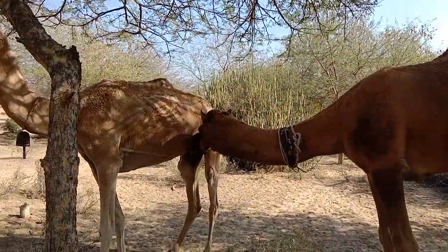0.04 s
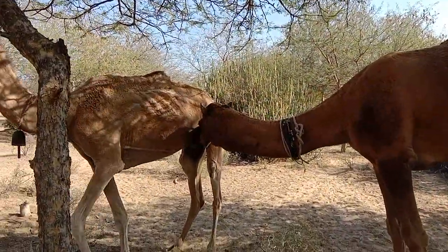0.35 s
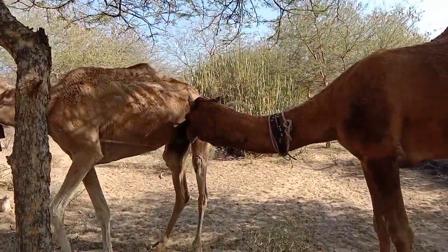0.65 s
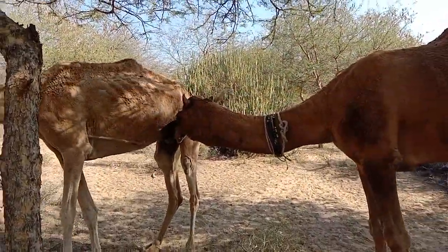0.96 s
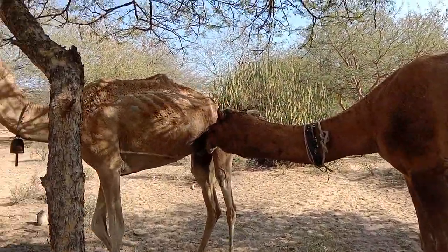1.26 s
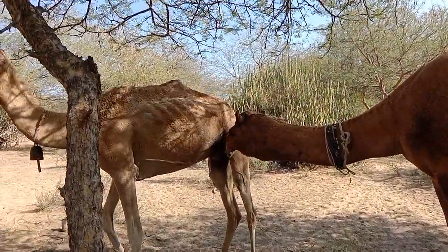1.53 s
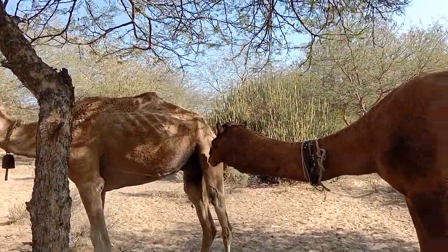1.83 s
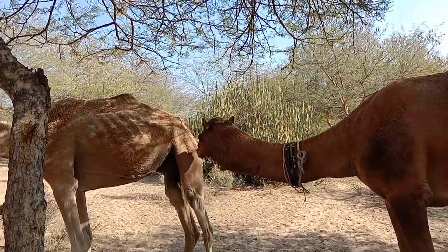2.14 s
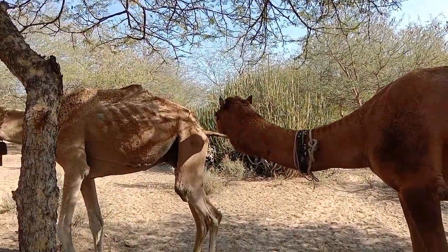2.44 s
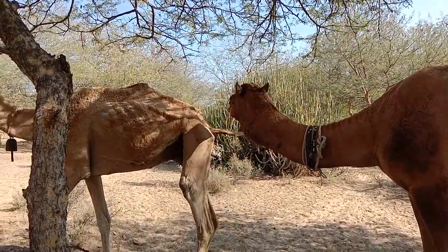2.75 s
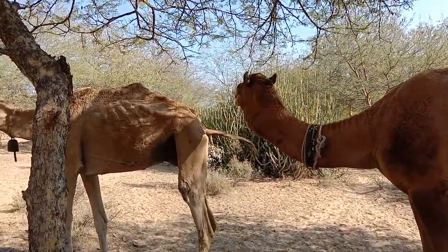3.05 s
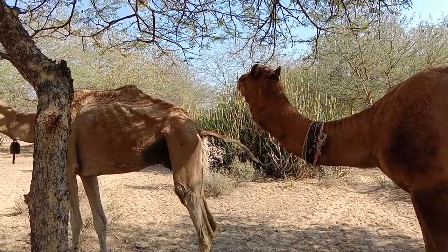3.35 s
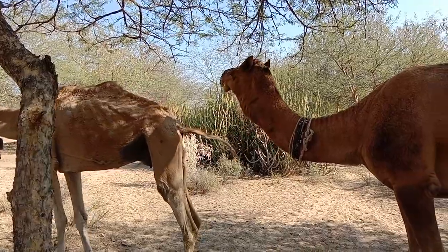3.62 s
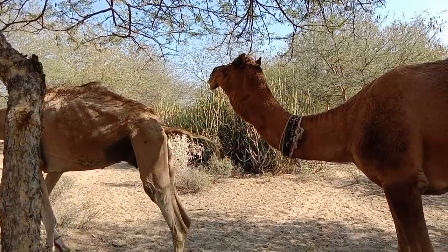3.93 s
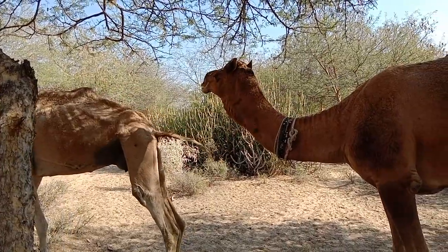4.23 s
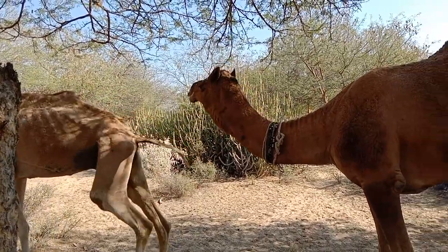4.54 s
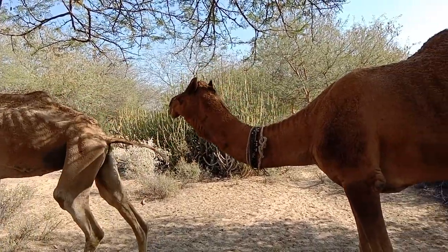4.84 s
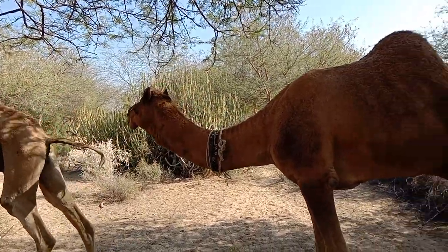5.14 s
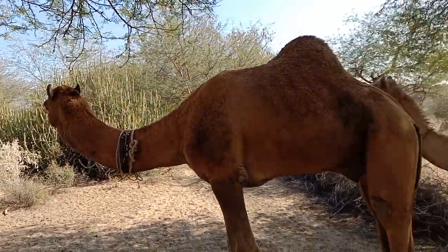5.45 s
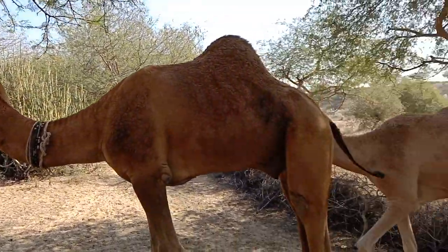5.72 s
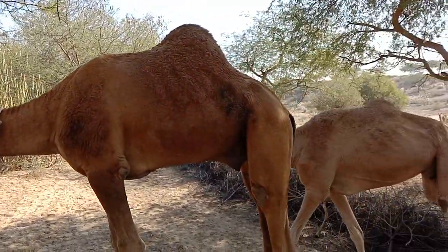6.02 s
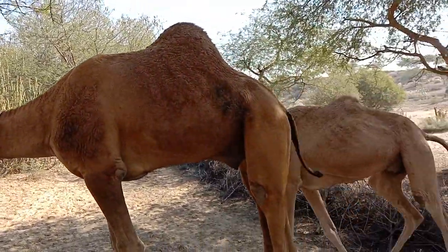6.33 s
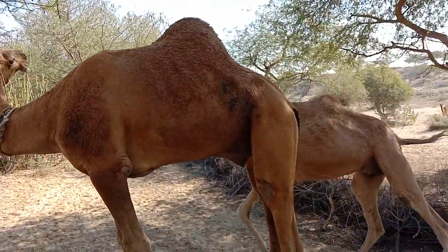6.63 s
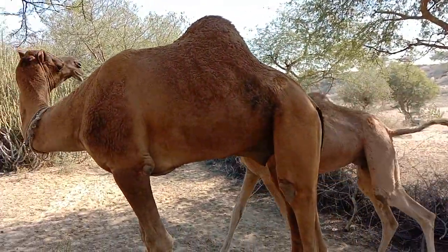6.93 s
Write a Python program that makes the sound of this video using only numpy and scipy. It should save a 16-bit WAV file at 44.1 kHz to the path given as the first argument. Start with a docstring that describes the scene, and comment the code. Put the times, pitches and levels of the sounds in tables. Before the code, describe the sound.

A camel's metal neck bell clanks unevenly, with dry twigs rustling and snapping and faint bird chirps in open air.

```python
"""Camel bell in desert scrub.

A sheet-metal bell on a camel's neck clanks unevenly as the animals shift about. The clapper strikes
the wall or rolls along the rim: the air in the bell hoots, the shell clangs above it. Feet scuff sand,
dry twigs rustle and snap, and a small bird chirps. A faint low rumble comes and goes underneath, and
a low drone swells at the end."""
import sys
import numpy as np
from scipy import signal
from scipy.fft import rfft, irfft
from scipy.io import wavfile
from scipy.ndimage import map_coordinates

SR = 44100
rng = np.random.default_rng(int(sys.argv[2]) if len(sys.argv) > 2 else 0)


def dump(signal):
    """Clip the signal to [-1, 1] and save it as 16-bit WAV at the path in sys.argv[1]."""
    limited = np.clip(np.atleast_2d(signal).T, -1, 1)
    pcm = np.round(limited * 32767).astype(np.int16)
    wavfile.write(sys.argv[1], SR, pcm)


N = 312228
TIME = np.arange(N) / SR


def from_db(db):
    """Decibels to gain."""
    return np.exp(np.asarray(db) * (np.log(10) / 20))


def unit_rms(x):
    """Scale to rms 1."""
    return x / np.sqrt(np.mean(x ** 2) + 1e-20)


def drift(rate_hz):
    """Slow random wander, rms 1."""
    knots = rng.standard_normal(4096)
    return unit_rms(np.interp(TIME * rate_hz, np.arange(len(knots)), knots))


def bandpass(x, order, low_hz, high_hz):
    """Butterworth band-pass."""
    return signal.sosfilt(signal.butter(order, [low_hz, high_hz], "band", fs=SR, output="sos"), x)


def coloured(x, colour):
    """Minimum-phase filter of unit power gain, shaped by (Hz, dB) rows."""
    size = 16384
    hz, db = np.transpose(colour)
    grid_hz = np.maximum(np.arange(size // 2 + 1) * SR / size, 1)
    gain = unit_rms(from_db(np.interp(np.log(grid_hz), np.log(hz), db)))
    causal_fold = np.r_[1, np.full(size // 2 - 1, 2), 1, np.zeros(size // 2 - 1)]
    cepstrum = irfft(np.log(gain)) * causal_fold
    return signal.fftconvolve(x, irfft(np.exp(rfft(cepstrum))))[:N]


def ring(drive, hz, t60_s):
    """One mode: a unit click starts a decaying sine of height 1."""
    radius, angle = from_db(-60 / (t60_s * SR)), 2 * np.pi * hz / SR
    return signal.lfilter([0, np.sin(angle)], [1, -2 * radius * np.cos(angle), radius ** 2], drive + 1e-18)


def clicks_at(times, heights):
    """One-sample clicks."""
    out = np.zeros(N)
    out[np.clip(np.round(times * SR).astype(int), 0, N - 1)] = heights
    return out


def bursts(times, db, t60_s):
    """Noise bursts: instant onset, exponential decay."""
    onsets = clicks_at(times, from_db(db) ** 2)
    power = signal.lfilter([1], [1, -from_db(-120 / (t60_s * SR))], onsets + 1e-18)
    return np.sqrt(power) * rng.standard_normal(N)


def grains(per_s, spread_db):
    """Random tiny contacts of unequal size, rms 1."""
    gaps, sizes, signs = rng.exponential(1, (3, 30000))
    times = np.cumsum(gaps) / per_s
    heights = from_db(spread_db * np.minimum(sizes, 4)) * np.sign(signs - np.log(2))
    inside = times < TIME[-1]
    return unit_rms(clicks_at(times[inside], heights[inside]))


def crunch(per_s, spread_db, patchy_db):
    """Bits of every size break: each band gets its own clumped grains; rms 1."""
    edges_hz = np.geomspace(500, 14000, 15)
    out = 0
    for low_hz, high_hz in zip(edges_hz, edges_hz[1:]):
        clumps = grains(per_s, spread_db) * from_db(patchy_db * drift(35))
        out += bandpass(clumps + 1e-18, 2, low_hz, high_hz)
    return unit_rms(out)


def swells(rows, attack_s, sag_db_per_s, release_db_per_s):
    """Rubbing contacts (t, length, levels...) summed in power: one gain curve per level column."""
    power = np.zeros((len(rows[0]) - 2, N))
    for start, length, *levels_db in rows:
        span = slice(*np.searchsorted(TIME, [start - attack_s, start + length + .5]))
        age = TIME[span] - start
        rise = np.clip(1 + age / attack_s, 0, 1) ** 2
        fall_db = sag_db_per_s * np.maximum(age, 0) + release_db_per_s * np.maximum(age - length, 0)
        power[:, span] += np.outer(from_db(levels_db), rise * from_db(-fall_db)) ** 2
    return np.sqrt(power)


# breeze spectrum: f/Hz, density/dB
BREEZE_COLOUR = [(18, -33), (30, -15), (449, -15.5), (649, -4.5), (822, -12.5), (2350, -8.5), (4190, -24.5),
                 (5450, -13.5), (7270, -22.5), (10200, -16), (16000, -26)]


def breeze(level_db):
    """Faint steady breeze with a trace of the bell's hollow note."""
    return from_db(level_db) * coloured(rng.standard_normal(N), BREEZE_COLOUR)


# low rumble envelope: t/s, level/dB
LOW_RUMBLE_LEVELS = [(0, -89.5), (0.5, -87.5), (1.05, -79.5), (1.3, -86), (2.0, -79.5), (2.35, -88.5),
                     (2.85, -77), (3.5, -81.5), (4.3, -84.5), (5.05, -89), (5.6, -83.5), (6.1, -101),
                     (6.6, -82), (7.08, -84)]
# low rumble spectrum: f/Hz, density/dB
LOW_RUMBLE_COLOUR = [(20, -10), (50, -7.5), (90, 3), (135, -1), (200, 2), (400, -2.5), (800, -26)]


def low_rumble(gain_db):
    """Faint low rumble that slowly swells and fades."""
    level_db = np.interp(TIME, *np.transpose(LOW_RUMBLE_LEVELS)) + gain_db
    return from_db(level_db) * coloured(rng.standard_normal(N), LOW_RUMBLE_COLOUR)


# bird calls: peak t/s, f/Hz, level/dB, 1/e half-length/s, rasp bandwidth/Hz
CHIRPS = [(0.01, 2340, -67.5, 0.087, 470), (0.395, 1816, -53.5, 0.0053, 620),
          (0.861, 2386, -59.5, 0.06, 60), (0.855, 2036, -56, 0.059, 61.7), (0.832, 1127, -53.5, 0.021, 90),
          (0.903, 2750, -59.5, 0.022, 150), (1.151, 1517, -45.5, 0.028, 130),
          (1.538, 1360, -64, 0.072, 30.1), (2.527, 2400, -52.5, 0.045, 220),
          (5.459, 3090, -45.5, 0.0083, 596), (5.691, 3080, -49.5, 0.015, 565),
          (5.906, 2955, -48.5, 0.016, 600), (6.149, 2150, -55, 0.014, 475), (6.383, 2026, -53, 0.019, 487),
          (6.615, 2080, -59, 0.03, 708), (6.819, 1950, -47, 0.019, 437)]


def bird(glide_hz, upper_ratio, upper_db, lisp_hz, lisp_db, near_db, near_s, far_db, far_s):
    """Raspy falling chips with a faint upper band and a high lisp; near and far bushes scatter them."""
    out = np.zeros(N)
    harshest_hz = max(row[-1] for row in CHIRPS)
    for peak_s, hz, db, half_s, width_hz in CHIRPS:
        span = np.abs(TIME - peak_s) < .3
        age = TIME[span] - peak_s
        phase = 2 * np.pi * np.cumsum(hz - glide_hz * np.tanh(age / half_s)) / SR
        white = rng.standard_normal((4, len(age)))
        rasp = unit_rms(signal.sosfilt(signal.butter(3, width_hz / 2, fs=SR, output="sos"), white))
        main = rasp[0] * np.sin(phase) + rasp[1] * np.cos(phase)
        upper = rasp[2] * np.sin(upper_ratio * phase) + rasp[3] * np.cos(upper_ratio * phase)
        hiss = bandpass(white[0], 2, lisp_hz - 2 * width_hz, lisp_hz + 2 * width_hz)
        lisp = unit_rms(hiss) * width_hz / harshest_hz
        near = from_db(near_db) * np.exp(-np.abs(age) / near_s)
        far = from_db(far_db) * np.exp(-np.abs(age) / far_s)
        envelope = np.exp(-(age / half_s) ** 2) + (near + far) * (age > 0)
        out[span] += from_db(db) * envelope * (main + from_db(upper_db) * upper + from_db(lisp_db) * lisp)
    return out


# clapper blows: t/s, hoot level/dB, hoot t60/s, hoot starting bend/Hz,
# shell family levels/dB (lowest mode, its twin, low, middle, top), favoured f/Hz (middle, top)
BLOWS = [(0.114, -37, 0.13, 16.5, -83, -68, -52, -54.5, -47.5, 3455, 4770),
         (0.257, -23.5, 0.14, -3.5, -72, -56.5, -53, -58, -61, 3130, 4840),
         (0.554, -17, 0.18, 4, -82, -57.5, -40.5, -42.5, -39.5, 3455, 5100),
         (0.719, -23, 0.21, 9.5, -87, -57, -57, -51, -52, 3455, 4805),
         (0.917, -13, 0.15, 10.5, -73, -63, -55, -41.5, -35.5, 3854, 4750),
         (0.958, -28.5, 0.25, 0.5, -49, -48, -56, -36.5, -36.5, 3265, 5500),
         (1.014, -17, 0.31, -3, -46, -53, -58, -40.5, -41, 3130, 5869),
         (1.38, -29.5, 0.12, -3, -69, -71, -45.5, -51, -40.5, 3098, 5000),
         (1.488, -29, 0.12, -16, -71, -72, -54, -50, -51, 3455, 5869),
         (1.601, -24.5, 0.16, -2, -79, -70, -48.5, -56, -70, 3450, 5100),
         (1.765, -26.5, 0.11, -18.5, -62, -40, -51, -34.5, -38.5, 3098, 5070),
         (1.806, -25.5, 0.17, -2.5, -56, -50, -57, -37.5, -38, 3098, 5070),
         (1.862, -26.5, 0.22, 7.5, -67, -40, -48.5, -71, -45.5, 3098, 4750),
         (1.907, -11, 0.16, -14.5, -36, -59, -67, -44.5, -32.5, 4295, 5680),
         (2.127, -13, 0.18, -10.5, -40.5, -67, -54, -47, -29, 3098, 5640),
         (2.158, -15.5, 0.073, 11.5, -50, -66, -46.5, -38.5, -37.5, 3455, 5030),
         (2.233, -25.5, .17, 19, -59, -46, -53, -45.5, -48.5, 3455, 4770),
         (2.458, -17.5, 0.17, -22.5, -42.5, -67, -59, -56, -33, 3854, 5869),
         (2.565, -16.5, .18, -6, -47.5, -38, -70, -25.5, -34, 3098, 5060),
         (2.576, -33, .17, 0, -65, -58, -57, -44, -30.5, 4080, 5930),
         (2.756, -11.5, .08, -12, -35.5, -55, -59, -45.5, -23.5, 3098, 5760),
         (2.963, -22, 0.19, 1, -53, -62, -37, -30, -28, 3455, 4790),
         (2.978, -8, 0.12, 0, -28.5, -57, -55, -45, -23, 3455, 5600),
         (3.027, -23, 0.16, 12, -35, -55, -69, -41.5, -27.5, 3854, 5270),
         (3.251, -14, 0.062, -48, -37.5, -66, -53, -58, -24.5, 3850, 5114),
         (3.311, -28, 0.25, 22.5, -53, -40, -40, -38.5, -34.5, 4009, 4790),
         (3.502, -14.5, 0.13, -38, -35.5, -50, -50, -43, -17.5, 3687, 5120),
         (3.704, -24, 0.1, 8.5, -69, -72, -49, -45.5, -33.5, 3854, 4970),
         (3.877, -25, 0.18, -21, -74, -68, -63, -47, -36, 3854, 5093),
         (4.154, -20, 0.17, -21, -50.5, -75, -74, -40, -28, 3854, 5680),
         (4.426, -20.5, .14, 11, -85, -58.5, -55.5, -44.5, -25.5, 3854, 4805),
         (4.578, -29, 0.11, -43.5, -82, -90, -82, -59, -41, 3098, 5093),
         (4.843, -14.5, 0.2, -47, -57, -76, -83, -36, -25.5, 3830, 5869),
         (5.173, -12.5, 0.21, 0.5, -80.5, -76, -56, -46.5, -28.5, 3250, 4770),
         (5.255, -38, .17, 0, -85, -76.5, -73, -42, -40, 3250, 6928),
         (5.331, -27, 0.22, -7.5, -88, -74, -86, -52, -42.5, 3265, 6250),
         (5.479, -15.5, .17, 3.5, -80.5, -73, -74, -56, -48.5, 3854, 5740),
         (5.502, -11.5, 0.17, -29, -38, -59, -70, -36.5, -24, 3854, 5680),
         (5.806, -41, 0.2, -9.5, -69, -64.5, -83, -71, -59, 3670, 5700),
         (6.556, -30.5, 0.21, -13.5, -63.5, -76, -77.5, -62, -44.5, 3030, 5680),
         (6.65, -16, 0.13, 13, -62, -44, -43, -49.5, -28, 3854, 5500),
         (6.861, -19.5, 0.19, -19.5, -51.5, -59, -55.5, -55.5, -40, 3800, 5680)]
# clapper leaning on the wall, muting the hoot: t/s, depth/dB
MUTES = [(2.009, 13.5), (2.192, 11), (2.528, 10), (2.808, 14), (3.272, 26.5), (3.551, 33), (5.286, 8),
         (6.698, 10.5)]


def hoot(rolling, pitch_hz, waver_hz, settle_s, rise_s, rise_shape, decay_shape,
         blow_db, roll_db, wobble_db, mute_s):
    """The air in the bell swells at each blow, glides to pitch and dies; rolling sustains it."""
    power = (rolling * from_db(roll_db + wobble_db * drift(60))) ** 2
    hz = pitch_hz + waver_hz * drift(54)
    for start, db, t60_s, bend_hz, *_ in BLOWS:
        span = slice(int(start * SR), min(int(start * SR) + SR // 2, N))
        age = TIME[span] - TIME[span][0]
        rise = 1 - np.exp(-(age / rise_s) ** rise_shape)
        decay_db = 60 * (age / t60_s) ** decay_shape
        power[span] += (rise * from_db(db + blow_db - decay_db)) ** 2
        hz[span] += bend_hz * np.exp(-age / settle_s)
    grit = 1 + .05 * drift(130)
    mute_db = sum(depth * np.exp(-np.minimum(((TIME - t) / mute_s) ** 2, 20)) for t, depth in MUTES)
    return np.sqrt(power) * from_db(-mute_db) * grit * np.sin(2 * np.pi * np.cumsum(hz) / SR)


# shell modes: f/Hz, level within family/dB, t60/s before damping
SHELL_MODES = [(1551, 0, .55), (1604, -4, .6), (1835, 0, .6), (2040, -14, .5), (2201, -20, .3),
               (2530, -15, .25), (2826, -15, .25), (3030, -12, .3), (3098, -5, .66), (3265, -2, .3),
               (3327, -8, .25), (3455, -1, .3), (3687, -8, .4), (3854, -2, .34), (4009, -5, .48),
               (4080, -8, .44), (4295, -12, .25), (4505, -9, .36), (4598, -5, .27), (4735, -8, .16),
               (4805, -3, .2), (5038, -2, .22), (5093, -5, .22), (5114, -1, .2), (5313, -1, .2),
               (5372, -5, .22), (5500, -5, .2), (5566, -3, .2), (5680, -1, .2), (5803, -9, .2),
               (5869, -1, .2), (5953, -12, .2), (6200, -6, .2), (6389, -9, .24), (6610, -4, .22),
               (6766, -11, .2), (6928, -12, .2), (7090, -11, .2), (7420, -15, .2), (8100, -18, .2),
               (8354, -18, .2)]
# borders of the five mode families: f/Hz
FAMILY_EDGES_HZ = [1580, 1700, 2500, 4300]
LIP_MODE_HZ, LIP_BOOST_DB = 4805, 8  # a blow on the very lip rings this mode almost alone


def shell(grazing, family_db, damping, favour_db, below_db_per_octave, above_db_per_octave,
          scatter_db, contact_s, chatter_db, chatter_t60_s, graze_db, roam_db):
    """Blows feed the modes their contact point favours, then chatter; grazing roams from mode to mode."""
    blows, modes = np.array(BLOWS), np.array(SHELL_MODES)
    times, levels_db, mode_hz = blows[:, 0], blows[:, 4:9] + family_db, modes[:, 0]
    families = np.searchsorted(FAMILY_EDGES_HZ, mode_hz)
    favoured_hz = np.where(families == families.max(), blows[:, -1:], blows[:, -2:-1])
    octaves = np.log2(mode_hz / favoured_hz)
    loss_db = octaves * np.where(octaves < 0, -below_db_per_octave, above_db_per_octave)
    # high modes depend most on the exact spot
    luck_db = scatter_db * mode_hz / mode_hz[-1] * rng.standard_normal(octaves.shape)
    lip_db = LIP_BOOST_DB * (mode_hz == LIP_MODE_HZ)
    graze = grazing * grains(per_s=300, spread_db=7.0)
    # modes build up while the clapper touches the wall
    lags = np.arange(int(contact_s * SR)) / SR
    push = np.hanning(len(lags)) * 4 / len(lags)
    contact_times = np.round(times * SR)[:, None] / SR + lags
    out = 0
    for family in np.unique(families):
        own = families == family
        distance = np.abs(octaves[:, own])
        nearest = distance == distance.min(axis=1, keepdims=True)
        boost_db = np.where(nearest, favour_db[family] + lip_db[own], luck_db[:, own])
        share = from_db(modes[own, 1] - loss_db[:, own] + boost_db)
        share /= np.linalg.norm(share, axis=1, keepdims=True)
        chatter = bursts(times, levels_db[:, family] + chatter_db[family], chatter_t60_s)
        for k, (hz, db, t60_s) in enumerate(modes[own]):
            heights = from_db(levels_db[:, family]) * share[:, k]
            struck = clicks_at(contact_times, np.outer(heights, push * np.cos(2 * np.pi * hz * lags)))
            rubbed = from_db(db) * (chatter + graze * from_db(graze_db[family] + roam_db * drift(16)))
            out += (-1) ** k * ring(struck + rubbed, hz, t60_s / damping[family])
    return bandpass(out, 3, 1150, 9500)  # a small shell radiates no bass


def jiggle(clang, travel_m, jerk_hz, buzz_depth, buzz_hz):
    """The bell jerks on its strap, so its partials waver in pitch; its loose seam makes them buzz."""
    sound_m_per_s = 343
    shift_samples = travel_m * drift(jerk_hz) * SR / sound_m_per_s
    moved = map_coordinates(clang, [np.arange(N) + shift_samples], order=3)
    return moved * (1 + buzz_depth * drift(buzz_hz))


# clapper contact spectrum: f/Hz, density/dB
CLATTER_COLOUR = [(40, -20.5), (300, -5.5), (1200, 5.5), (2500, -27), (5500, 0.5), (7000, -11), (8500, -4),
                  (12000, -4.5), (16000, -16.5)]
# bell mouth spectrum: f/Hz, density/dB
CLONK_COLOUR = [(100, -35.5), (420, -29.5), (620, 12.5), (830, 1), (1000, -16), (1400, -18), (3000, -43)]


def clatter(crack_db, crack_t60_s, wash_db, wash_t60_s, clonk_db, clonk_t60_s):
    """Square hits crack, the rough metal leaves a faint wash, hard blows clonk from the mouth."""
    times, hoot_db, _, _, lowest_db, twin_db, _, _, top_db, _, _ = np.transpose(BLOWS)
    force_db = (hoot_db + top_db) / 2
    square_db = (np.maximum(lowest_db, twin_db) + top_db) / 2
    hardness_db = .5 * (force_db - force_db.max())
    crack = bursts(times, square_db + crack_db, crack_t60_s)
    wash = bursts(times, force_db + wash_db, wash_t60_s)
    clonk = bursts(times, force_db + hardness_db + clonk_db, clonk_t60_s)
    return coloured(crack + wash, CLATTER_COLOUR) + coloured(clonk, CLONK_COLOUR)


# dull thumps: t/s, level/dB
THUMPS = [(0.556, -67), (0.92, -64), (2.127, -64), (3.503, -61), (4.424, -69), (5.176, -63), (6.364, -69),
          (6.765, -69), (6.96, -72)]


def thuds(low_noise_db, thump_db, t60_s, top_hz):
    """A faint burst of low noise under each clank; a few heavier thumps stand out."""
    blow_times, hoot_db = np.array(BLOWS)[:, :2].T
    thump_times, peak_db = np.transpose(THUMPS)
    low_bursts = bursts(blow_times, hoot_db + low_noise_db, t60_s)
    thumps = bursts(thump_times, peak_db + thump_db, t60_s)
    return bandpass(low_bursts + thumps, 2, 30, top_hz) * np.sqrt(SR / 2 / top_hz)


# clapper on the rim: t/s, length/s, hoot level/dB, grazing level/dB
ROLLS = [(0.13, 0.12, -30.5, -56), (0.575, 0.3, -35, -63.5), (1.04, 0.064, -25.5, -39.5),
         (1.395, 0.062, -36.5, -45.5), (1.5, 0.25, -43.5, -62), (1.92, 0.075, -30.5, -42.5),
         (2.0, 0.14, -46, -49.5), (2.3, 0.14, -48.5, -69), (2.6, 0.18, -23.5, -43.5),
         (2.75, 0.06, -32, -50), (2.83, 0.14, -34.5, -38.5), (3.05, 0.25, -29, -43),
         (3.34, 0.21, -26, -49.5), (3.6, 0.11, -45.5, -52.5), (3.75, 0.12, -36, -40),
         (3.95, 0.18, -43.5, -49.5), (4.28, 0.076, -62.5, -50.5), (4.52, 0.31, -46.5, -58),
         (4.89, 0.031, -29.5, -38.5), (5.255, 0.078, -33, -42.5), (5.35, 0.15, -44, -72.5),
         (5.53, 0.04, -23, -37.5), (5.61, 0.081, -52.5, -78), (6.59, 0.08, -41, -50),
         (6.68, 0.081, -32.5, -40.5), (6.77, 0.2, -35, -71), (6.9, 0.071, -38, -65),
         (7.0, 0.23, -48.5, -86)]


def rim_rolls():
    """The clapper rolls along the rim: gain curves that drive the hoot and graze the shell."""
    return swells(ROLLS, attack_s=.015, sag_db_per_s=12, release_db_per_s=423)


# brushes against scrub: t/s, length/s, leaf level/dB, twig level/dB
BRUSHES = [(0.15, 0.22, -62, -72.5), (0.5, 0.22, -74.5, -64.5), (0.8, 0.032, -55, -65.5),
           (0.95, 0.083, -58, -59), (1.05, 0.065, -48, -48.5), (1.2, 0.17, -52.5, -63.5),
           (1.48, 0.58, -63, -67), (1.76, 0.079, -61, -60.5), (2.0, 0.31, -56, -67),
           (2.47, 0.13, -49.5, -56.5), (2.765, 0.054, -44, -45.5), (2.88, 0.086, -51.5, -52),
           (3.07, 0.3, -52, -55), (3.42, 0.22, -75, -65), (3.875, 0.061, -38, -43.5),
           (3.97, 0.052, -44.5, -49), (4.05, 0.17, -54.5, -60), (4.23, 0.072, -65, -56.5),
           (4.5, 0.44, -57.5, -66), (5.53, 0.17, -60, -65.5), (5.9, 0.075, -70.5, -81.5),
           (6.37, 0.038, -62.5, -71.5), (6.58, 0.48, -71, -76)]
# twig and leaf spectra: f/Hz, density/dB
TWIG_COLOUR = [(500, -1.5), (1500, -6.5), (3000, -3.5), (4300, -4), (5500, 6.5), (6600, -6.5), (8000, -22),
               (11000, -8)]
LEAF_COLOUR = [(800, -26), (5000, -37), (8000, -15), (9500, -3), (11500, 1.5), (15000, 11.5), (16000, 2)]


def rustle(twig_db, leaf_db, flutter_db):
    """An animal brushes through dry scrub: twigs and fine leaves tick in uneven surges."""
    leaf_gain, twig_gain = swells(BRUSHES, attack_s=.06, sag_db_per_s=6.5, release_db_per_s=251.5)
    surge = from_db(flutter_db * drift(60))
    leaves = leaf_gain * from_db(leaf_db) * grains(per_s=1700, spread_db=6.5)
    twigs = twig_gain * from_db(twig_db) * crunch(per_s=550, spread_db=3.2, patchy_db=3.4)
    return coloured(surge * twigs, TWIG_COLOUR) + coloured(surge * leaves, LEAF_COLOUR)


# breaking twigs: t/s, level/dB
SNAPS = [(0.299, -42.5), (0.836, -31.5), (1.3, -32.5), (1.384, -26.5), (1.57, -28.5), (2.4149, -35),
         (2.7367, -23), (2.7714, -25), (2.797, -16.5), (2.915, -19.5), (3.933, -33), (4.019, -30),
         (4.161, -23), (4.721, -12.5), (4.906, -22), (6.3665, -30)]
# snap spectrum: f/Hz, density/dB
SNAP_COLOUR = [(1000, -25.5), (3000, -4.5), (5500, 11.5), (8000, -11.5), (12000, 5.5), (16000, 6.5)]


def snaps(gain_db, t60_s):
    """Brittle twigs break with a short bright crack."""
    times, db = np.transpose(SNAPS)
    return coloured(bursts(times, db + gain_db, t60_s), SNAP_COLOUR)


# foot drags: t/s, length/s, level/dB
SCUFFS = [(0.81, 0.051, -61.5), (0.97, 0.081, -53.5), (1.062, 0.035, -37.5), (1.12, 0.42, -55.5),
          (1.8, 0.27, -56.5), (2.74, 0.27, -65), (3.86, 0.22, -76)]
# sand spectrum: f/Hz, density/dB
SAND_COLOUR = [(400, -35.5), (900, -3), (1200, 8), (1500, 11.5), (2100, 4), (2900, 3), (4200, -9.5),
               (7000, -37.5)]


def scuffs(gain_db):
    """Sand crunches under dragging feet."""
    drag, = swells(SCUFFS, attack_s=.063, sag_db_per_s=29.5, release_db_per_s=308)
    sand = crunch(per_s=600, spread_db=2.5, patchy_db=4.5)
    return coloured(drag * from_db(gain_db) * sand, SAND_COLOUR)


def drone(peak_s, peak_db, slope_db_per_s, hz, t60_s):
    """A low, rough drone swells up."""
    level_db = peak_db - slope_db_per_s * np.abs(TIME - peak_s)
    return from_db(level_db) * unit_rms(ring(rng.standard_normal(N), hz, t60_s))


def scene():
    """Bell, scrub, bird and air in the open, with no walls; mono."""
    rolling, grazing = rim_rolls()
    bell = hoot(rolling, pitch_hz=640.5, waver_hz=3.0, settle_s=.02, rise_s=.0057, rise_shape=1.35,
                decay_shape=1.235, blow_db=-1.5, roll_db=-2.0, wobble_db=1.93, mute_s=.006)
    # lists: one value per mode family, low to high
    clang = shell(grazing, family_db=[-1.15, -.7, 0, -2.5, -2], damping=[.85, .87, .98, 1.27, 1.22],
                  favour_db=[0, 0, -9.5, 19, 12.5], below_db_per_octave=-1, above_db_per_octave=13,
                  scatter_db=7.5, contact_s=.003,
                  chatter_db=[-48, -42.5, -41.5, -33, -52], chatter_t60_s=.05,
                  graze_db=[-59, -58.5, -63, -49.5, -49], roam_db=6.5)
    bell += jiggle(clang, travel_m=.011, jerk_hz=35, buzz_depth=.16, buzz_hz=170)
    bell += clatter(crack_db=-28.5, crack_t60_s=.022, wash_db=-33, wash_t60_s=.18,
                    clonk_db=-6, clonk_t60_s=.054)
    bell += thuds(low_noise_db=-64.5, thump_db=5.0, t60_s=.1, top_hz=201)
    scrub = rustle(twig_db=2.5, leaf_db=-1.0, flutter_db=2.3) + scuffs(gain_db=1.3)
    scrub += snaps(gain_db=-10.5, t60_s=.054)
    chirps = bird(glide_hz=121.8, upper_ratio=2.5, upper_db=-18.5, lisp_hz=10500, lisp_db=-15,
                  near_db=-5.5, near_s=.015, far_db=-27.5, far_s=.11)
    background = breeze(level_db=-78.5) + low_rumble(gain_db=2.5)
    background += drone(peak_s=7.07, peak_db=-63, slope_db_per_s=114, hz=133, t60_s=.1)
    return (bell + scrub + chirps + background)[None]


def record(dry):
    """Steep low-pass at 16 kHz."""
    return signal.sosfilt(signal.ellip(10, .3, 70, 16000, fs=SR, output="sos"), dry)


dry = scene()
out = record(dry)
dump(out)
```